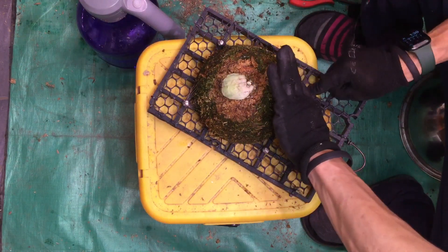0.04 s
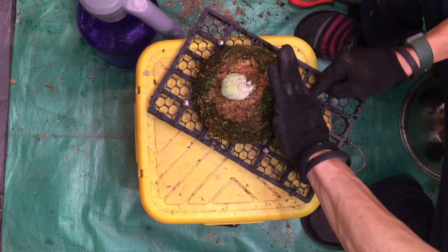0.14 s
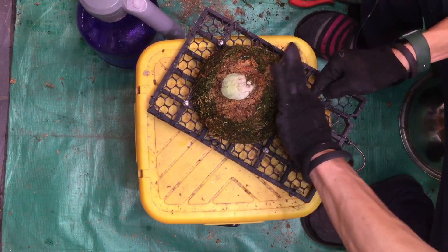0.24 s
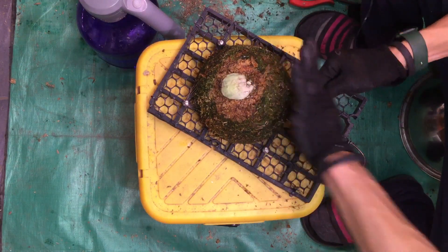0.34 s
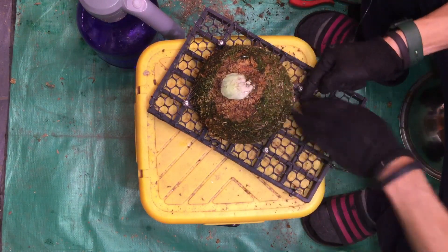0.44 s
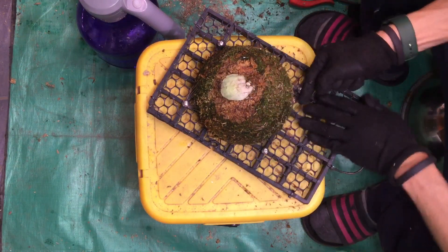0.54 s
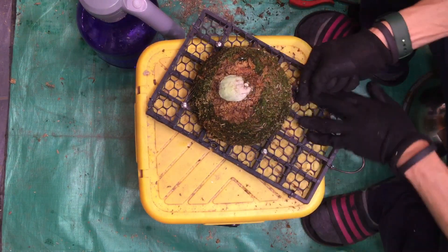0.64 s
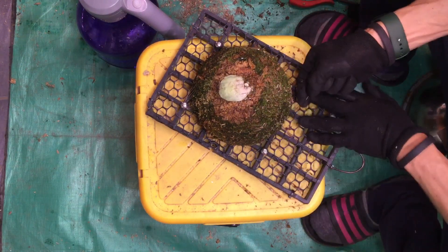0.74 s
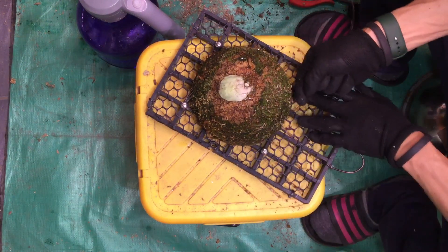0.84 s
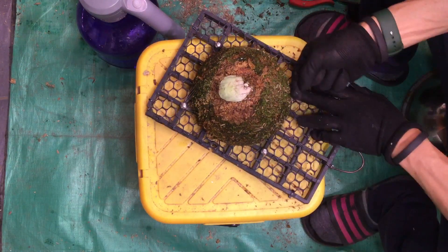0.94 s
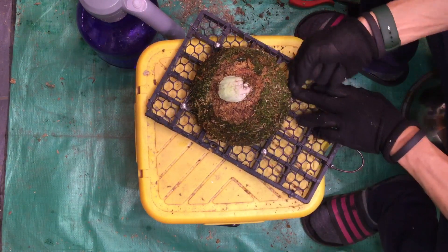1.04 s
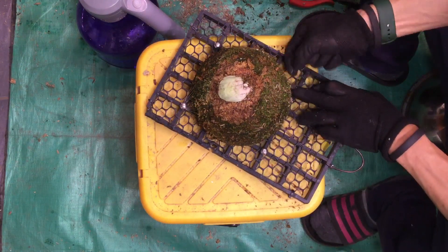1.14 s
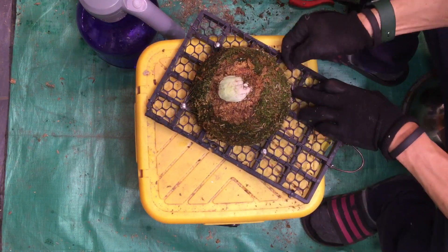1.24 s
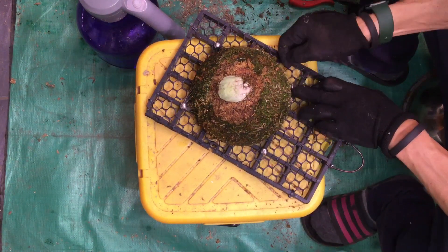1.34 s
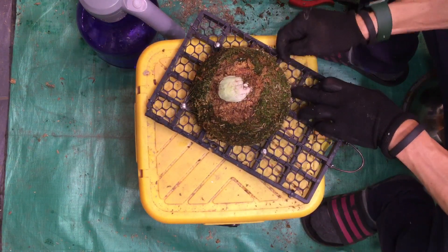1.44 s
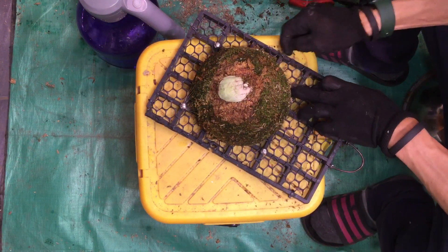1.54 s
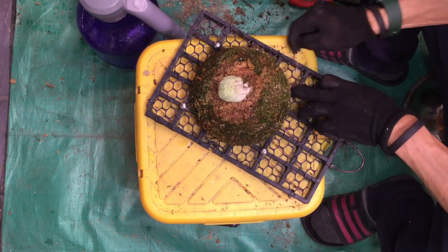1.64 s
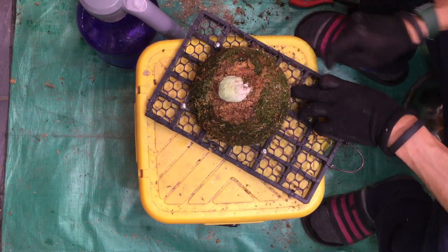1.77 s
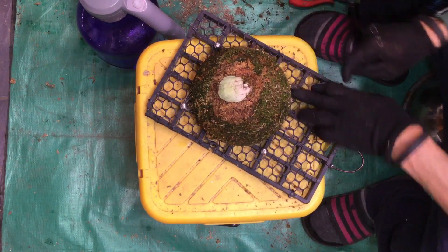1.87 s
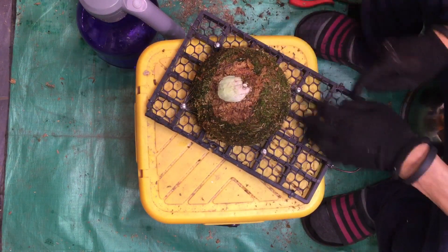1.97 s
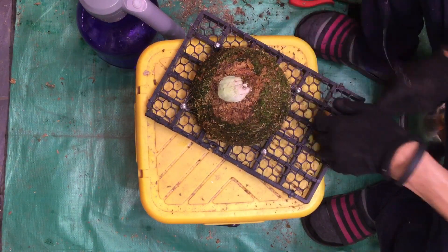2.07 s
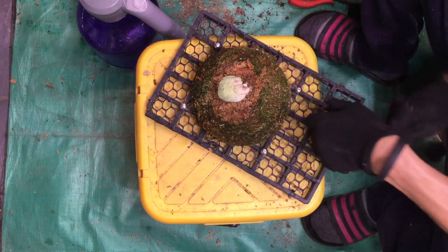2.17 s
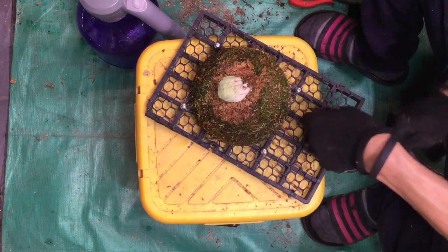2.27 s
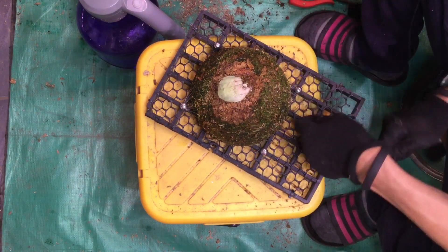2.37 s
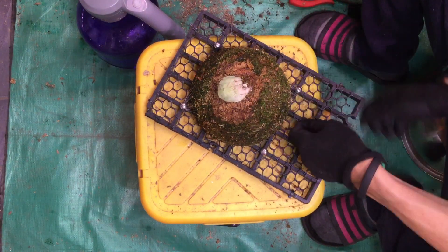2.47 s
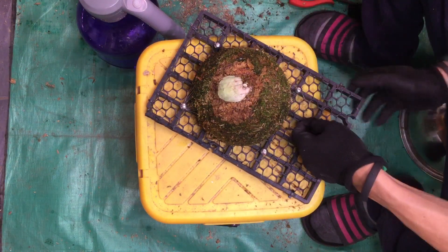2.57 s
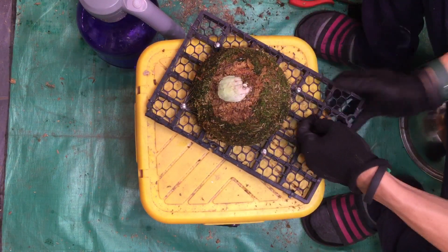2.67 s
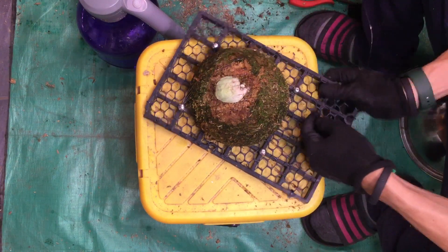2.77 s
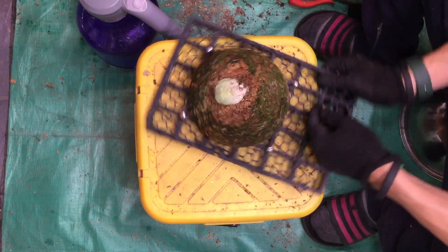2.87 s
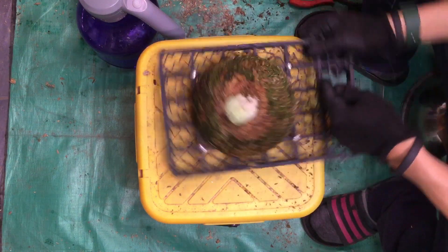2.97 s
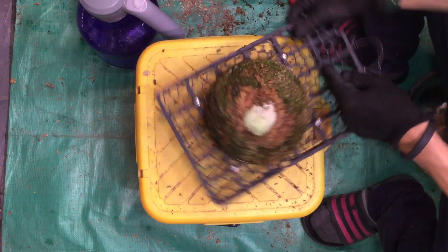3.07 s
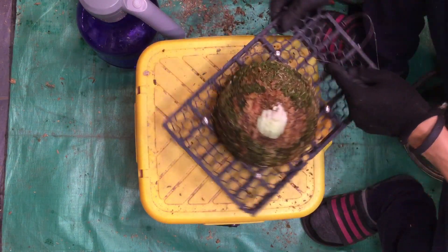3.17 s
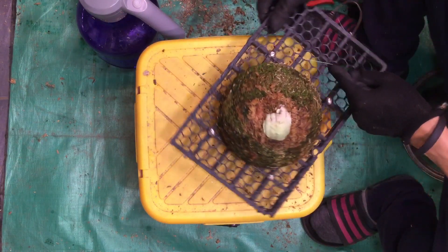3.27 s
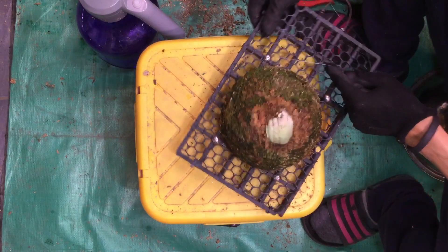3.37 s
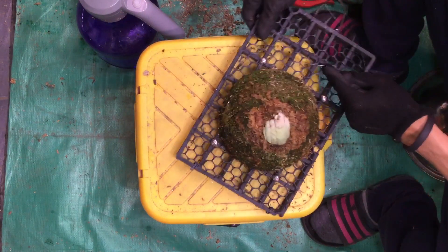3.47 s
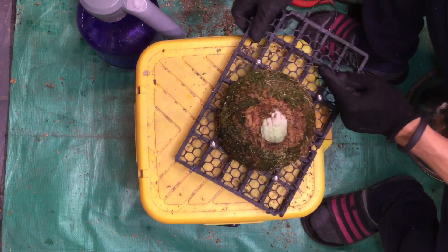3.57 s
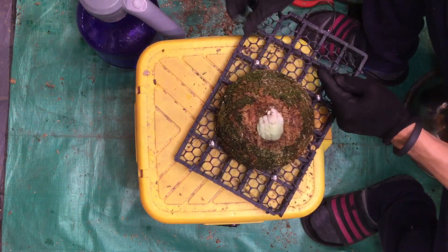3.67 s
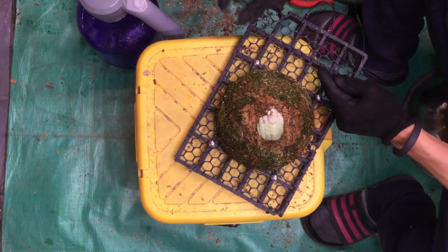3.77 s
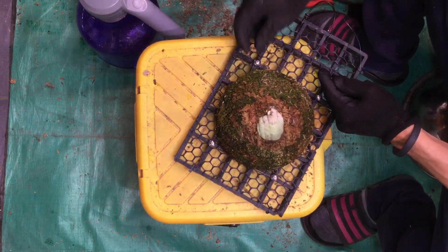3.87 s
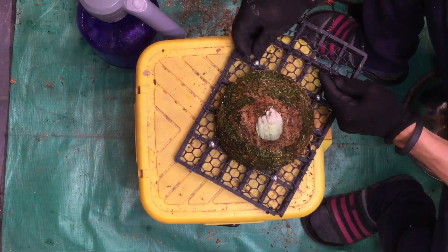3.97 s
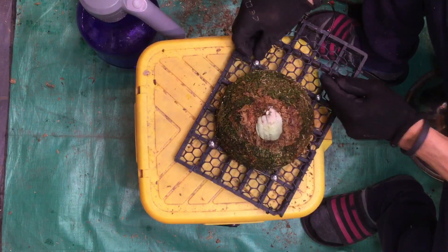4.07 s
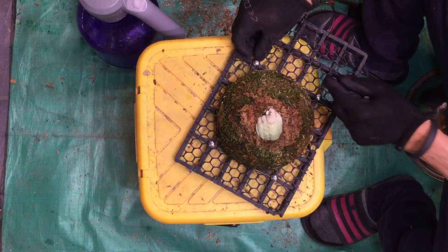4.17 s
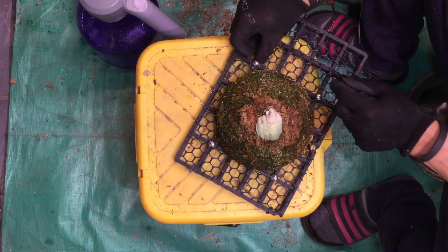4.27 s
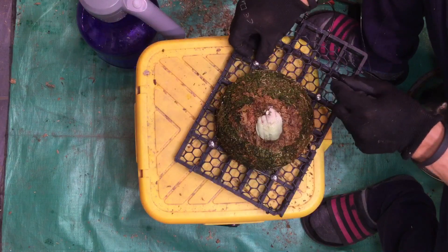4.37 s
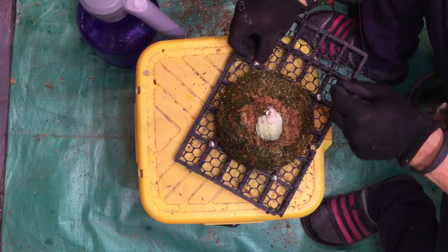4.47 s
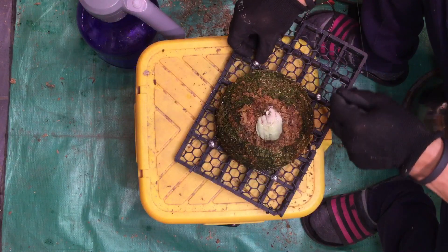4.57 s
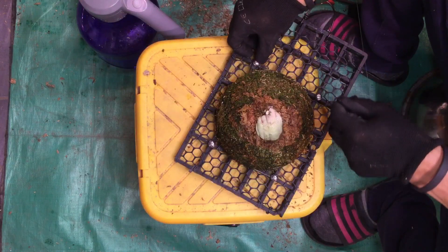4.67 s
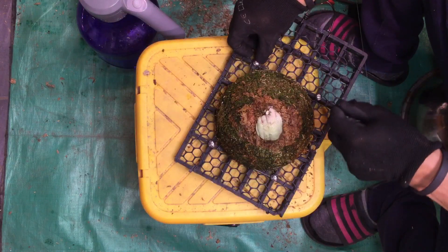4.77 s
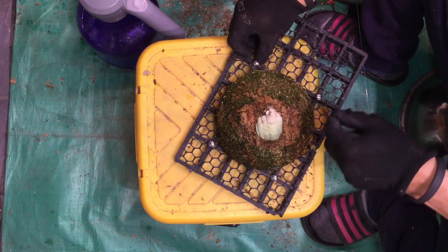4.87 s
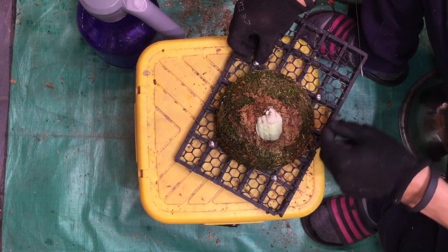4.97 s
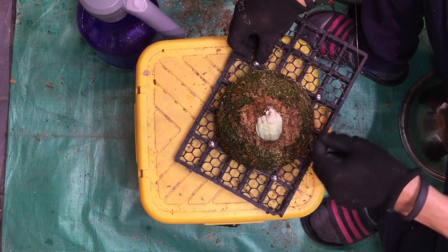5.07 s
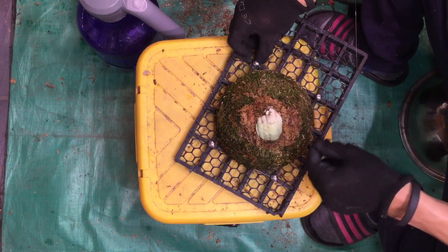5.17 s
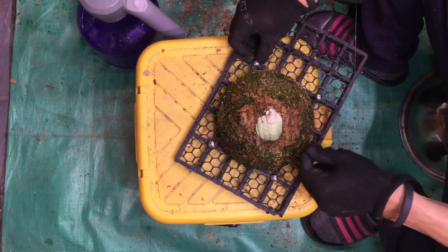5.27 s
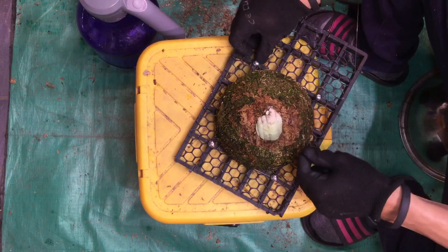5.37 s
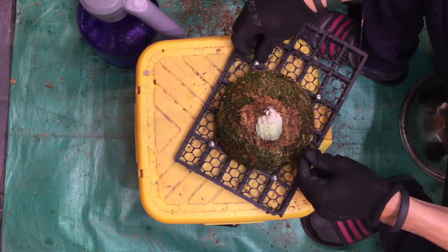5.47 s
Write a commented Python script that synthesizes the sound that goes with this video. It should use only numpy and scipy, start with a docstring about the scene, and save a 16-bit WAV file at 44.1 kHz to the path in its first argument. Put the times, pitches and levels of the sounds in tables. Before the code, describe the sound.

Over the steady hum of a fan, gloved hands shift a plastic grid on a hollow plastic lid, heard up close indoors. The lid bumps softly, and the grid's stiff ribs snap and creak briefly. After some faint rubbing and moss crackle, the grid lands with three louder, rattling knocks that make the lid thump. One more click follows, and the handling fades into light scuffing.

```python
"""A small room: a plastic grid board carrying a moss ball is handled and turned on a plastic tub's lid.
The board drags, clacks down and rattles; the hollow lid thumps under knocks and presses.
Stiff ribs of the grid snap, and one creaks. Gloves brush the board, moss stems crackle faintly,
and a light scuff ends the handling. A fan hums throughout."""
import sys
import numpy as np
from scipy import signal
from scipy.fft import rfft, irfft, next_fast_len
from scipy.io import wavfile
from scipy.ndimage import uniform_filter1d

SR = 44100
rng = np.random.default_rng(int(sys.argv[2]) if len(sys.argv) > 2 else 0)


def wav_record(signal):
    """Record a signal, one row per channel, as 16-bit PCM in the file named by sys.argv[1]."""
    frames = np.transpose(np.atleast_2d(signal))
    bounded = np.clip(frames, -1, 1)
    # unit amplitude maps onto the largest positive 16-bit level
    quanta = np.round(bounded * 32767).astype(np.int16)
    wavfile.write(sys.argv[1], SR, quanta)


N = 242991
TIME = np.arange(N) / SR

# moving air (frequency [Hz], relative density [dB])
AIR_SPECTRUM = [(25, -8.5), (48, -11.5), (85, -9), (120, -12), (145, -5.5), (190, -9), (280, -15),
                (480, -14.5), (800, -23), (1250, -24), (2000, -31), (4200, -39), (9000, -52.5),
                (15500, -53.5)]
# fan resonances (frequency [Hz], width [Hz], level [dB])
FAN_RESONANCES = [(118.1, 14, -57.5), (442, 4, -72), (594.4, 20, -67.5), (1082, 39, -69), (1354, 20, -73),
                  (2423, 82, -77.5)]
# board dragging on the lid (time [s], relative level [dB])
DRAG_LEVELS = [(0.0, -62.5), (0.69, -56.5), (1.06, -60.5), (2.02, -52.5), (2.16, -56), (2.31, -61.5),
               (2.96, -51.5), (3.42, -55.5), (3.68, -49), (4.32, -57), (4.65, -59.5), (4.86, -56),
               (5.0, -82), (5.2, -59), (5.5, -72)]
# rib snaps (time [s], relative level [dB], high-pass [Hz], low-pass [Hz],
# note 1 [Hz], its gain [dB], note 2 [Hz], its gain [dB])
SNAPS = [(0.301, -55.5, 1000, 15000, 3550, -9.5, 6500, -20),
         (1.6073, -48, 1000, 16000, 5000, -14, 6900, -9), (1.6882, -35.5, 1110, 18000, 3220, -14, 5330, -8),
         (1.7599, -33, 400, 15140, 3310, -12.5, 6500, -9), (1.874, -56, 7000, 18000, 8560, -14, 12500, -12),
         (1.9288, -37.5, 1000, 16000, 3180, -19, 5400, -5.5),
         (1.939, -43, 2000, 17000, 5000, -10, 6400, -7), (2.482, -60, 3000, 8000, 5000, -10, 6600, -8),
         (2.607, -54, 4500, 17000, 5300, -5, 8700, -12), (2.907, -53, 1000, 10000, 5300, -6, 6560, -9),
         (3.122, -52.5, 3500, 8500, 4140, -8, 6500, -12),
         (3.477, -34.5, 1000, 9200, 4820, -6.5, 3560, -5.5), (3.583, -58, 2500, 14000, 3500, -4, 6700, -16),
         (3.673, -41, 1000, 11000, 4990, 2, 6600, -10), (4.2088, -41.5, 2580, 12900, 4180, -3, 5850, -20),
         (5.441, -55, 6000, 17000, 6340, -20, 9050, -10)]
# crack of a snap (frequency [Hz], relative density [dB])
SNAP_SPECTRUM = [(300, -16), (1300, 7.5), (2200, 3.5), (3200, 4), (4400, -3), (6800, -4.5), (7500, -13),
                 (8600, -1.5), (9500, -13), (12000, -6.5), (15000, -10.5)]
# mode clusters of the thin ribs (frequency [Hz], width [Hz], gain [dB])
RIB_BANDS = [(2860, 160, -3), (3520, 250, -1), (5430, 500, -4), (5880, 150, -7), (6400, 300, -2),
             (6970, 250, -2), (8500, 600, -6), (12500, 3000, -11)]
# board landing on the lid (time [s], relative level [dB], spot note [Hz], its prominence [dB],
# high-pass [Hz], low-pass [Hz], loss per rattle [dB], relative thump level [dB])
LANDINGS = [(0.468, -52, 626, 9, 250, 1490, 19, -33.5), (0.699, -38, 640, 10.5, 450, 1150, 14, -43),
            (1.6075, -48, 910, -15, 300, 7000, 8.5, -36), (1.928, -36.5, 1380, 13, 950, 6000, 21, -48),
            (2.0042, -35.5, 1260, 4, 200, 2880, 12, -31.5), (2.902, -43.5, 1910, 8, 350, 2930, 4.5, -37.5),
            (3.4738, -28, 1450, 6, 695, 3600, 5, -44), (3.4758, -28, 750, 10, 625, 4900, 7, -48),
            (3.6672, -23.5, 1290, 3.5, 510, 2900, 4, -17.5), (3.6709, -28.5, 2920, 9.5, 600, 6000, 13, -49),
            (4.005, -39, 1400, 8.5, 303, 2000, 7, -48), (4.0116, -37, 2750, 8, 594, 4370, 5.5, -46),
            (4.0824, -46.5, 2190, 8, 350, 4280, 18, -40.5)]
# crack of a landing (frequency [Hz], relative density [dB])
KNOCK_SPECTRUM = [(100, -28.5), (300, 7.5), (520, 5), (750, 8.5), (1400, 0.5), (1800, -4), (3100, -7),
                  (4200, -10), (6500, -11), (8000, -16), (16000, -5.5)]
# board modes (frequency [Hz], gain [dB], t60 [s])
BOARD_MODES = [(404, -10, .13), (686, -5, .15), (730, -2, .12), (905, -2, .16), (991, -4, .12),
               (1208, -7, .17), (1300, -1, .14), (1423, -2, .13), (1512, -6, .13), (1760, -9, .11),
               (2080, -8, .12), (2422, -10, .12), (2917, -10, .13), (3250, -12, .12), (4926, -19, .13),
               (6665, -23, .1)]
# lid modes; the fourth is the main drum mode (frequency [Hz], gain [dB], t60 [s])
LID_MODES = [(67.3, -22, 0.16), (108.4, -14, 0.2), (144.7, -22, 0.47), (176, 1.5, 0.17), (215.4, -8, 0.076),
             (269, -15, 0.18), (330.6, -18.5, 0.11), (402, -21.5, 0.15)]
# hands and moss ball loading the lid (time [s], relative level [dB], push time [s], t60 scale [ratio],
# low-mode gain from sag [dB], nominal lid pitch under load [Hz])
LID_PRESSES = [(0.572, -37, 0.011, 1.6, -3, 180.3), (0.713, -26.5, 0.011, 0.85, 7, 171),
               (1.503, -35, 0.0085, 0.83, 6, 177), (1.936, -33.5, 0.0033, 1.4, -12, 182),
               (2.011, -30.5, 0.0035, 0.29, -2, 222), (2.042, -35, 0.0047, 0.57, 1, 188),
               (2.578, -30, 0.01, 1.04, 3, 183), (2.765, -35, 0.0096, 0.9, -7, 176.3),
               (2.839, -36.5, 0.0032, 1.2, 4.5, 179.3), (2.887, -40.5, 0.0027, 0.49, 8, 222),
               (2.999, -41, 0.0084, 1.7, 14, 177.3), (3.4766, -14, 0.0058, 0.43, -4.5, 190.5),
               (3.684, -13, 0.0062, 0.52, 5.5, 176.4), (3.731, -33.5, 0.0085, 0.39, 17.5, 183),
               (4.001, -16, 0.017, 1.2, -4.5, 179.5), (4.083, -31, 0.0034, 0.65, -3, 182.5),
               (4.428, -49.5, 0.012, 2.1, 20.5, 181.8), (4.825, -51, 0.019, 1.6, 23.5, 183),
               (5.156, -50, 0.0098, 0.67, 22, 185)]
# glove strokes (peak time [s], swell and fade time [s], level [dB])
GLOVE_STROKES = [(0.61, 0.054, -67), (1.494, 0.016, -58.5), (1.98, 0.065, -72), (2.47, 0.035, -75),
                 (2.606, 0.013, -66.5), (2.73, 0.027, -77), (2.89, 0.055, -68.5), (3.09, 0.038, -80),
                 (3.63, 0.054, -70.5), (5.0, 0.12, -93)]
# glove friction (frequency [Hz], relative density [dB])
GLOVE_SPECTRUM = [(300, -12), (1200, 7.5), (3000, 4.5), (6000, -2), (10000, -1), (15000, -3.5)]
# creeping rib (time [s], pitch [Hz], level [dB])
CREAK_PATH = [(1.65, 2900, -85), (1.678, 2880, -59), (1.712, 2860, -59), (1.735, 2800, -58),
              (1.75, 2700, -84)]
# fingers on the moss (peak time [s], swell and fade time [s], relative level [dB])
MOSS_TOUCHES = [(2.75, .04, -72), (2.89, .05, -69), (4.99, .15, -67.5)]
# room decay (frequency [Hz], t60 [s])
ROOM_DECAY = [(100, 0.46), (500, 0.16), (1500, 0.14), (4000, 0.12), (8000, 0.09), (16000, 0.056)]


def from_db(db):
    """Decibels to gain."""
    return 10 ** (np.asarray(db) / 20)


def rms_one(x):
    """Scale to rms 1."""
    return x / np.sqrt(np.mean(x ** 2) + 1e-20)


def unit_energy(x):
    """Scale to energy 1."""
    return x / np.sqrt(np.sum(x ** 2) + 1e-20)


def at_hz(points, hz):
    """Read a table on a log-frequency axis."""
    points_hz, values = np.transpose(points)
    return np.interp(np.log(np.maximum(hz, 1)), np.log(points_hz), values)


def add(out, at_s, sound):
    """Mix a sound in at a time."""
    i = int(at_s * SR)
    out[i:i + len(sound)] += sound[:N - i]


def coloured(x, spectrum):
    """Minimum-phase filter with the given spectrum."""
    n = 2 * next_fast_len(len(x))
    gain = from_db(at_hz(spectrum, np.fft.rfftfreq(n, 1 / SR)))
    cepstrum = irfft(np.log(gain))
    cepstrum[1:n // 2] *= 2
    cepstrum[n // 2 + 1:] = 0
    return irfft(rfft(x, n) * np.exp(rfft(cepstrum)))[:len(x)]


def resonance(x, hz, width_hz):
    """Two-pole band-pass, peak gain 1."""
    r = np.exp(-np.pi * width_hz / SR)
    feedback = [1, -2 * r * np.cos(2 * np.pi * hz / SR), r * r]
    return signal.lfilter(np.array([1, 0, -1]) * (1 - r * r) / 2, feedback, x)


def murmur(hz, width_hz, widen=1):
    """Noise through two resonances in series, rms 1."""
    band = resonance(rng.standard_normal(N), hz, width_hz)
    return rms_one(resonance(band, hz, widen * width_hz))


def band_limit(x, thin_hz, dull_hz):
    """High-pass and low-pass: a small contact is thin, a soft one dull."""
    x = signal.sosfilt(signal.butter(2, thin_hz, "high", fs=SR, output="sos"), x)
    return signal.sosfilt(signal.butter(2, dull_hz, fs=SR, output="sos"), x)


def ring(t, hz, t60_s):
    """Decaying sine."""
    return np.sin(2 * np.pi * hz * t) * from_db(-60 * t / t60_s)


def decaying(impulses, t60_s):
    """Give each impulse an exponential tail."""
    return signal.lfilter([1], [1, -from_db(-60 / (t60_s * SR))], impulses)


def transient(x, spectrum):
    """Colour a pulse; scale it to the energy of 5 ms at rms 1."""
    return unit_energy(coloured(x, spectrum)) * np.sqrt(.005 * SR)


def crack(t, spectrum, t60_s, spike):
    """Contact spike, then dense, quickly damped modes."""
    burst = unit_energy(rng.standard_normal(len(t)) * from_db(-60 * t / t60_s))
    burst[0] += spike
    return transient(burst, spectrum)


def fan(air_db=-54.5):
    """Steady moving air with a few narrow resonances."""
    air = from_db(air_db) * rms_one(coloured(rng.standard_normal(N), AIR_SPECTRUM))
    return air + sum(from_db(db) * murmur(hz, width_hz) for hz, width_hz, db in FAN_RESONANCES)


def drag():
    """Friction keeps the lid's main mode murmuring."""
    level_db = np.interp(TIME, *np.transpose(DRAG_LEVELS)) + .5
    return from_db(level_db) * murmur(hz=183, width_hz=55, widen=3)


def rib_cluster(t, centre_hz, count=7, spread_hz=420, t60_s=.088):
    """Close, unevenly spaced modes of neighbouring ribs beat as they decay."""
    pitches_hz = centre_hz + spread_hz * (2 * (np.arange(count) + rng.random(count)) / count - 1)
    return sum(rng.choice([-1, 1]) * ring(t, hz, t60_s) for hz in pitches_hz) / np.sqrt(count)


def rib_snaps(bite_db=11, shiver_db=-17, shiver_t60_s=.115):
    """A rib slips: a bright crack and two ringing notes over a shiver of the whole grid."""
    out, t = np.zeros(N), TIME[:SR // 3]
    for at_s, db, thin_hz, dull_hz, note1_hz, note1_db, note2_hz, note2_db in SNAPS:
        noise = rng.standard_normal(len(t))
        ribs = sum(from_db(band_db) * rms_one(resonance(noise, hz, width_hz))
                   for hz, width_hz, band_db in RIB_BANDS)
        shiver = ribs * from_db(shiver_db - 60 * t / shiver_t60_s)
        snap = crack(t, SNAP_SPECTRUM, t60_s=.022, spike=.7)
        notes = 0
        for hz, note_db in ((note1_hz, note1_db), (note2_hz, note2_db)):
            bite = from_db(bite_db) * resonance(snap, hz, width_hz=1000)
            notes += from_db(note_db) * (rib_cluster(t, hz) + bite)
        add(out, at_s, from_db(db - 8) * band_limit(snap + notes + shiver, thin_hz, dull_hz))
    return out


def contact(spot_hz, spot_db, tap_db=-3, modes_db=-15):
    """Plastic on plastic: a crack, a peak or dip at the struck spot's note, and the board's modes."""
    t = TIME[:SR // 5]
    blow = crack(t, KNOCK_SPECTRUM, t60_s=.065, spike=.75)
    tap = from_db(tap_db) * transient(signal.unit_impulse(len(t)), KNOCK_SPECTRUM)
    note = (from_db(spot_db) - 1) * resonance(blow + tap, spot_hz, .17 * spot_hz)
    modes = sum(rng.choice([-1, 1]) * from_db(db + 2 * rng.normal()) * ring(t, hz, t60_s)
                for hz, db, t60_s in BOARD_MODES)
    return blow + note + from_db(modes_db) * modes


def board_knocks(contacts=4, first_gap_s=.0048, wander_oct=1.16, dulling=.95):
    """The board lands and rattles on wandering spots: contacts ever weaker, duller, further apart."""
    out = np.zeros(N)
    for at_s, db, spot_hz, spot_db, thin_hz, dull_hz, loss_db, _ in LANDINGS:
        for k in range(contacts):
            note_hz = spot_hz * 2 ** (k * rng.uniform(0, wander_oct))
            clack = band_limit(contact(note_hz, spot_db), thin_hz, dull_hz * dulling ** k)
            add(out, at_s + first_gap_s * k ** 1.7, from_db(db - .5 - k * loss_db) * clack)
    return out


def thump(db, push_s, t60_scale, sag_db, pitch_ratio=1, rim_db_per_oct=3.5, neutral_push_s=.0096):
    """The hollow lid swells while pushed, then rings. Sag weights low modes; a quick push wakes the rim."""
    t = TIME[:SR // 2]
    rim_db = rim_db_per_oct * np.log2(neutral_push_s / push_s)
    tilt = [(110.2, sag_db), (179.05, 0), (220.4, rim_db)]  # (frequency [Hz], gain [dB])
    swell = np.sin(np.pi / 2 * np.minimum(t / push_s, 1)) ** 1.06
    free_s = np.maximum(t - push_s, 0)
    out = 0
    for hz, mode_db, t60_s in LID_MODES:
        loaded_hz = hz * pitch_ratio ** np.interp(hz, [220, 270], [1, 0])  # stiff rim keeps its pitch
        gain = from_db(db - 2 + mode_db + at_hz(tilt, hz))
        decay = from_db(-60 * free_s / (t60_s * t60_scale))
        out += gain * swell * decay * np.sin(2 * np.pi * loaded_hz * t)
    return out


def lid_thumps(lag_s=.0022, usual_hz=179.05, grip_s=4.048, choke_db_per_s=898):
    """The lid gives under each knock and press. A hand grips the board and chokes earlier presses."""
    out = np.zeros(N)
    for at_s, *_, db in LANDINGS:
        add(out, at_s + lag_s, thump(db, push_s=.0048, t60_scale=.8, sag_db=.5))
    for at_s, db, push_s, t60_scale, sag_db, pitch_hz in LID_PRESSES:
        boom = thump(db, push_s, t60_scale, sag_db, pitch_hz / usual_hz)
        held_s = np.maximum(at_s + TIME[:len(boom)] - grip_s, 0) * (at_s < grip_s)
        add(out, at_s, boom * from_db(-choke_db_per_s * held_s))
    return out


def gloves(rest_db=-79, rest_catches_per_s=700, stroke_catches_per_s=1800, grain_db=2.6, grain_s=.003):
    """Soft brushing: many tiny fibres catch and merge into a grainy hiss."""
    pressure = from_db(rest_db) + sum(from_db(db) * np.exp(-np.abs(TIME - at_s) / swell_s)
                                      for at_s, swell_s, db in GLOVE_STROKES)
    rate_per_s = rest_catches_per_s + stroke_catches_per_s * pressure / pressure.max()
    caught = rng.random(N) < rate_per_s / SR
    catches = rms_one(caught * rng.standard_normal(N) / np.sqrt(rate_per_s))
    grain = rms_one(uniform_filter1d(rng.standard_normal(N), int(grain_s * SR)))
    hiss = .75 * rng.standard_normal(N)
    return pressure * from_db(grain_db * grain) * rms_one(coloured(catches + hiss, GLOVE_SPECTRUM))


def rib_creak(slips_per_s=600, t60_s=.01):
    """A rib creeps along its neighbour: uneven slips excite one narrow, sinking resonance."""
    times_s, hz, db = np.transpose(CREAK_PATH)
    carrier = np.exp(2j * np.pi * np.cumsum(np.interp(TIME, times_s, hz)) / SR)
    slips = rng.random(N) < slips_per_s / SR
    creak = (carrier * decaying(slips / carrier, t60_s)).real  # each slip rings at the gliding pitch
    return np.interp(TIME, times_s, from_db(db), left=0, right=0) * rms_one(creak)


def moss(crackles_per_s=70, t60_s=.018):
    """Fingers press the moss; single stems give faint, high crackles."""
    breaks = np.zeros(N)
    for at_s, swell_s, db in MOSS_TOUCHES:
        touch = np.exp(-((TIME - at_s) / swell_s) ** 2)
        stems = rng.random(N) < crackles_per_s * touch / SR
        breaks += from_db(db) * stems * rng.uniform(.4, 1, N)
    hiss = rms_one(resonance(rng.standard_normal(N), hz=12800, width_hz=5500))
    return decaying(breaks + 1e-18, t60_s) * hiss


def scuff(peak_s=5.29, swell_s=.51, db=-73):
    """The hands settle; light rubbing excites one board resonance."""
    swell = np.exp(-((TIME - peak_s) / swell_s) ** 2)
    return from_db(db) * swell * murmur(hz=1530, width_hz=150)


def room(x, build_s=.011):
    """Diffuse reflections build up and decay, faster in the treble."""
    t, edges_hz = TIME[:SR // 2], np.geomspace(50, 18000, 10)
    tail = 0
    for low_hz, high_hz in zip(edges_hz, edges_hz[1:]):
        band_pass = signal.butter(2, [low_hz, high_hz], "band", fs=SR, output="sos")
        t60_s = at_hz(ROOM_DECAY, np.sqrt(low_hz * high_hz))
        tail += signal.sosfilt(band_pass, rng.standard_normal(len(t))) * from_db(-60 * t / t60_s)
    onset = 1 - np.exp(-(t / build_s) ** 2)
    return signal.fftconvolve(x, unit_energy(tail * onset))[:N]


def scene():
    """Handling sounds with their room sends, plus dry drag and fan; mono."""
    lid = lid_thumps()
    board = board_knocks()
    ribs = rib_snaps() + rib_creak()
    rubbing = gloves() + moss() + scuff()
    send = from_db(-24) * lid + from_db(-12.5) * board + from_db(-9.5) * ribs + from_db(-3.5) * rubbing
    return (lid + board + ribs + rubbing + room(send) + drag() + fan())[None]


def record(dry, low_cut_hz=53, high_cut_hz=15900):
    """The microphone loses deep bass; the top is cut steeply."""
    thin = signal.sosfilt(signal.butter(3, low_cut_hz, "high", fs=SR, output="sos"), dry)
    return signal.sosfilt(signal.ellip(10, .1, 70, high_cut_hz, fs=SR, output="sos"), thin)


dry = scene()
out = record(dry)
wav_record(out)
```